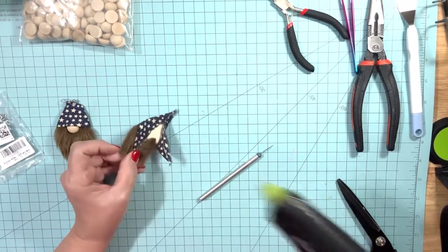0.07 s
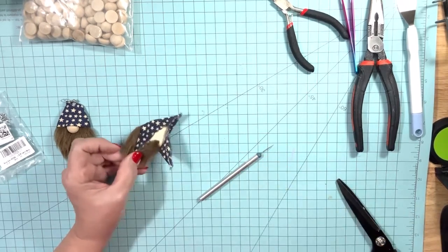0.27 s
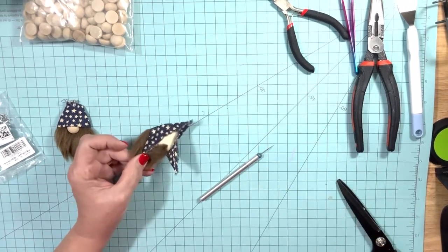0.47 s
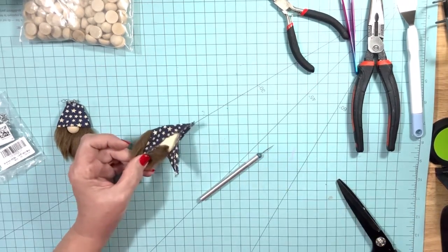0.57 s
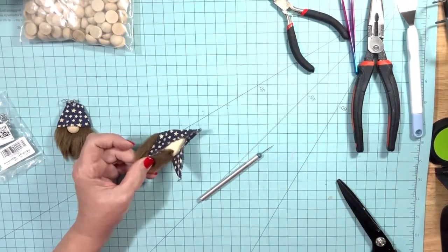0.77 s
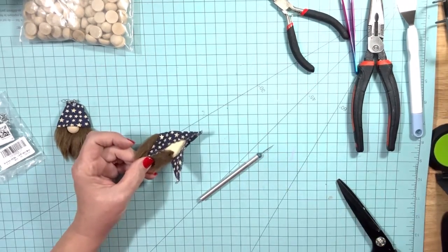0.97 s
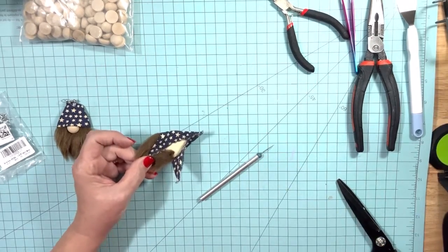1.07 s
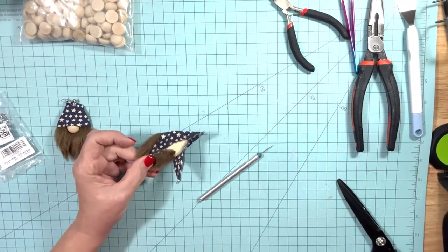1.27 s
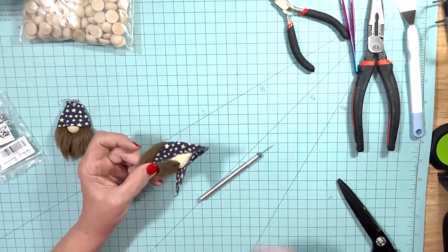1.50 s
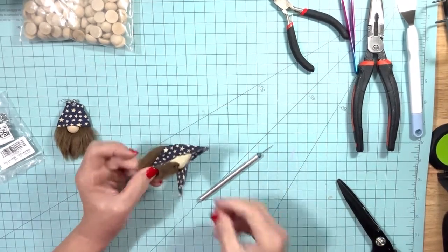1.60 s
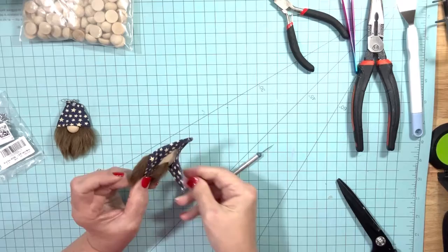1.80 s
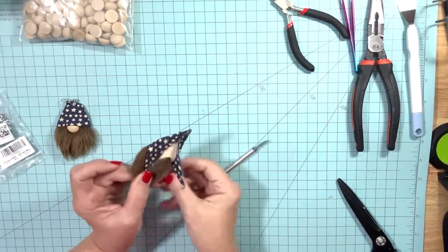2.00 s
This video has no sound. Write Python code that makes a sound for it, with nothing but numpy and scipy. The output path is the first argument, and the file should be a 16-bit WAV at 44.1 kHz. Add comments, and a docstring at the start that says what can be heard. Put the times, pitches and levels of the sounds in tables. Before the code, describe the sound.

Hard hollow plastic knocks and rattles as a glue gun is set down in a quiet humming room.

```python
"""In a small quiet room a plastic glue gun is put down on a mat-covered table: it touches, rocks and drops onto its stand.
Each contact is a push with a rough tail that excites decaying shell modes and an unpitched clack,
while the table modes give a thump dispersed by bending waves; filtered, decaying noise forms the echoes.
An appliance sounds throughout: wavering sines hum, shaped noise blows, narrow noise bands whistle.
Faint puffs of narrow hiss rustle near the end as the hand comes back."""
import sys
import numpy as np
from scipy import signal
from scipy.fft import rfft, irfft
from scipy.io import wavfile

SR = 44100
rng = np.random.default_rng(int(sys.argv[2]) if len(sys.argv) > 2 else 0)


def unload_audio(sound):
    """Save the sound as a 16-bit wav file, at the path given as the first command line argument."""
    columns = np.transpose(np.atleast_2d(sound))
    # keep every value between -1 and 1, then stretch to whole-number steps
    steps = np.round(np.clip(columns, -1, 1) * 32767)
    wavfile.write(sys.argv[1], SR, steps.astype(np.int16))


N = 90404

# Contacts of the gun: [t/s, shell energy level/dB before stereo balance, shell slope/(dB per octave),
# chatter decay time/s, favoured f/Hz, relative thump level/dB, thump slope/(dB per octave)]
GUN_CONTACTS = [(0.09, -38, 6, 0.0043, 13000, -68, -22), (0.7930, -8.5, -2, 0.0057, 3700, -20.5, -2),
                (.8030, -17, -0.5, 0.012, 3100, -34.5, -5.5), (.8105, -13.5, -5, 0.006, 2000, -33.5, 3.5),
                (0.8138, -12.5, 0.5, 0.0047, 5870, -30, 1), (0.8215, -10, -1.5, 0.0022, 3570, -41, 0),
                (.8320, -14, 0, 0.0069, 1410, -42.5, 3.5), (0.8403, -7, 1, 0.0086, 2800, -46, 2.5),
                (0.8452, -3.5, -2, 0.0077, 6250, -37, 6), (0.8483, -7.5, -3.5, 0.00081, 1000, -37.5, 5),
                (0.8533, -7.5, -4, 0.0041, 2370, -28, -8), (0.8600, -7, -2, 0.0068, 2440, -33, 7),
                (0.875, -15, 1, 0.0072, 2470, -51.5, 6), (0.911, -17.5, -0.5, 0.045, 3700, -41, -1),
                (0.9393, -0.5, 4, 0.0019, 6820, -29.5, 3), (0.9400, 1.5, 3, 0.00087, 3700, -25, -2.5),
                (0.9408, 6.5, -1, 0.0014, 1056, -29, 7), (.9432, -2.5, 0.5, 0.00081, 3700, -50, 6),
                (0.9476, -2, -8.5, 0.0032, 2230, -37, 4.5), (.9550, -5.5, 0.5, 0.0021, 4500, -43, 10),
                (0.9559, 0, -2, 0.0016, 1760, -37, 8), (0.9616, -10, 1, 0.0023, 1660, -38.5, 4.5),
                (0.9668, -6, -7, 0.0022, 1230, -36, 3), (.9760, -20, 0, .005, 2200, -37, 5)]
# Modes of the hollow shell: [f/Hz, relative level/dB, 60 dB decay time/s]
SHELL_MODES = [(704, -1.5, 0.022), (954, 1.5, 0.015), (1329, 0, 0.018), (1680, -4.5, 0.018),
               (1924, -2.5, 0.021), (2311, -5, 0.027), (2650, -5, 0.013), (3004, -6.5, 0.016),
               (3250, -7.5, 0.01), (3700, -2, 0.0093), (4340, -8, 0.014), (4950, -6, 0.0066),
               (6460, -4, 0.0036), (7480, -8, 0.0055)]
# Modes of the table top: [f/Hz, relative level/dB, 60 dB decay time/s]
TABLE_MODES = [(70.6, -6, 0.098), (90.7, 0, 0.079), (137, -3.5, 0.088), (190, 0, 0.06), (270, 1.5, 0.031),
               (379.6, -4, 0.11), (502, -6.5, 0.071)]
# Unpitched clack of the contact: [f/Hz, relative level/dB]
CLACK_SPECTRUM = [(400, -14), (1000, -12), (2500, -12), (5000, 1), (8000, 9.5), (10000, 5.5), (12200, 14.5),
                  (16000, 3.5)]
# Stereo phase of the shell sound: [f/Hz, lead of left over right/rad]
SHELL_PHASE_LEAD = [(0, 0), (900, -.5), (2200, -1.5), (2750, -2.7), (3450, 0), (4200, 0), (5500, 1.2),
                    (7500, 1.8), (9500, 3.1), (12000, 4.9), (14500, 6.3), (22000, 6.3)]
# Stereo balance of the direct knocks: [f/Hz, left minus right level/dB]
DIRECT_BALANCE = [(60, 0), (200, -.5), (380, -3), (700, 0), (1300, 3), (2400, 2.5), (4400, .5), (8000, 0)]
# Reverberation time of the room: [f/Hz, 60 dB decay time/s]
REVERB_TIME = [(100, 0.41), (1000, 0.17), (4000, 0.14), (12000, 0.1)]
# Width of the reflections: [f/Hz, side minus mid level/dB]
REVERB_WIDTH = [(100, -27), (300, -6.5), (800, 2), (5000, -1.5), (7500, -3.5), (9500, 11), (11000, 0),
                (13000, -9)]
# Rustles as the hand comes back: [t/s of peak, rms level/dB at peak]
HAND_RUSTLES = [(1.630, -65), (1.698, -65), (1.715, -68), (1.772, -66), (1.804, -64), (1.864, -64)]
# Motor tones: [mean f/Hz, rms level/dB before waver, waver spread/dB]
MOTOR_TONES = [(58.26, -40.5, 1.26), (120.7, -54, 3), (186.2, -62, 1.5)]
# Whistles in the rush: [centre f/Hz, full width at half amplitude/Hz, rms level/dB averaged over
# the channels, left minus right level/dB]
WHISTLES = [(400, 15, -66.5, 18), (783.7, 11, -63, 0.5), (1437, 14, -65.5, 6.5), (1679, 13, -65.5, 16),
            (1743, 41, -62, 14), (2387, 200, -66.5, 5), (3440, 110, -89.5, -5)]
# Air noise common to both channels: [f/Hz, relative spectral level/dB]
AIR_COMMON = [(30, -33), (82, -21.5), (101, -8.5), (135, -8.5), (166, -18), (244, -13.5), (314, -25.5),
              (385, -17.5), (579, -26.5), (700, -23), (1200, -31.5), (1690, -22.5), (2170, -36),
              (2600, -36.5), (3200, -41), (6750, -46.5), (7730, -57), (8300, -79), (10500, -101.5),
              (11300, -58.5), (14000, -53), (15500, -54.5), (15900, -100)]
# Air noise opposed in the channels: [f/Hz, relative spectral level/dB]
AIR_OPPOSED = [(24, -88.5), (40, -47.5), (124, -40.5), (202, -5.5), (222, -14), (264, -4), (464, -11),
               (721, -0.5), (1070, -6), (1620, -4), (1880, -3), (3910, -19), (8580, -25), (11800, -34),
               (14000, -80)]
# Stereo balance of the air noise: [f/Hz, left minus right level/dB]
AIR_STEREO = [(60, 7.5), (110, 0.5), (200, -1.5), (380, -1.5), (700, 4.5), (1290, 9), (2380, 4.5),
              (4400, 0.5), (8120, 0.0), (15000, 1.5)]

SPAN, LEAD_IN = 16384, 256  # samples per response, and kept ahead of each contact
SHELL_LOW_HZ, TABLE_LOW_HZ = 350, 55  # radiation falls steeply below these
SHELL_PIVOT_HZ, TABLE_PIVOT_HZ = 2660, 173  # the slopes turn about these
STRIKE_SPREAD_DB = 2  # uneven excitation of the modes
FAVOUR_DB, FAVOUR_OCTAVES = 10, 0.26  # lift near the pitch of the part that touches
CHATTER_S = 0.0022  # a contact that chatters this long is as much scrape as sharp push
BEND_DELAY_S, BEND_POWER = 0.002985, 0.89  # delay at 100 Hz, and how it falls with pitch
ROOM_DB, ROOM_START_S = -11, 0.003
RUSTLE_HZ, RUSTLE_WIDTH_HZ, RUSTLE_S = 3930, 220, 0.009
HUM_WAVER_HZ, HUM_DETUNE = 8.0, 0.008  # detune is a fraction of the pitch
AIR_MID_DB, AIR_SIDE_DB = -45, -51  # rms before the stereo balance
CUTOFF_HZ = 16700
LEFT_RIGHT = np.array([[1], [-1]])  # opposite signs in the two channels


def from_db(db):
    """Decibel law: 20 dB is a factor of ten in amplitude."""
    return 10 ** (np.asarray(db) / 20)


def rms_one(x):
    """Normalisation to unit root-mean-square amplitude."""
    return x / np.sqrt(np.mean(x ** 2) + 1e-20)


def at_hz(points, hz):
    """Linear interpolation of a table over logarithmic frequency."""
    table = np.array(points)
    return np.interp(np.log(hz + 1), np.log(table[:, 0]), table[:, 1])


def both(x, balance):
    """Interchannel level difference: each frequency is shared between left and right."""
    half_db = at_hz(balance, np.fft.rfftfreq(N, 1 / SR)) / 2
    return irfft(rfft(x) * from_db([half_db, -half_db]), N)


def gun():
    """Superposition of impacts: each contact radiates a shell knock and a dispersed table thump."""
    hz = np.fft.rfftfreq(SPAN, 1 / SR)
    clack = from_db(at_hz(CLACK_SPECTRUM, hz))
    table = body(TABLE_MODES) * bending_waves(hz)
    lead = np.exp(0.5j * np.interp(hz, *np.transpose(SHELL_PHASE_LEAD)) * LEFT_RIGHT)
    fade = np.clip(2 - 2 * np.arange(SPAN) / SPAN, 0, 1)  # over the second half
    out = np.zeros((2, N + SPAN))
    for s, db, slope_db, chatter_s, favour_hz, thump_db, thump_slope_db in GUN_CONTACTS:
        knock = shell_knock(hz, clack, chatter_s, favour_hz, slope_db)
        knock *= from_db(db) / np.linalg.norm(irfft(knock, SPAN))
        thump = from_db(thump_db) * table * tilt(hz, thump_slope_db, TABLE_PIVOT_HZ, TABLE_LOW_HZ)
        sound = irfft(knock * lead + thump, SPAN)
        # The phase lead can put sound ahead of the contact, so room is left for it.
        start = int(s * SR) - LEAD_IN
        out[:, start:start + SPAN] += np.roll(sound, LEAD_IN, axis=1) * fade
    return both(out[:, :N], DIRECT_BALANCE)


def shell_knock(hz, clack, chatter_s, favour_hz, slope_db):
    """Linear response: the spectrum of the force times that of the shell and the clack."""
    uneven_db = rng.normal(0, STRIKE_SPREAD_DB, len(SHELL_MODES))
    modes = [(f, level + odd, t60) for (f, level, t60), odd in zip(SHELL_MODES, uneven_db)]
    octaves_off = np.log2((hz + 1) / favour_hz)
    favour = from_db(FAVOUR_DB * np.exp(-(octaves_off / FAVOUR_OCTAVES) ** 2))
    slope = tilt(hz, slope_db, SHELL_PIVOT_HZ, SHELL_LOW_HZ)
    return rfft(contact_force(chatter_s)) * (body(modes) + clack) * favour * slope


def contact_force(chatter_s):
    """Impulsive excitation followed by friction: a sharp push, then exponentially decaying noise."""
    t = np.arange(SPAN) / SR
    push = t == 0
    decay = rms_one(np.exp(-t / chatter_s)) / np.sqrt(SPAN)
    return push + chatter_s / CHATTER_S * decay * rng.standard_normal(SPAN)


def body(modes):
    """Modal superposition: a struck body rings in decaying sines, here of alternating sign."""
    t, ring = np.arange(SPAN) / SR, 0
    for k, (hz, db, t60) in enumerate(modes):
        ring = ring + (-1) ** k * from_db(db - 60 * t / t60) * np.sin(2 * np.pi * hz * t)
    return rfft(ring)


def bending_waves(hz):
    """Dispersion: bending waves of low pitch arrive later, so the thump sweeps downward."""
    # The phase is the integral over frequency of the delay BEND_DELAY_S * (100 / hz) ** BEND_POWER.
    rest = 1 - BEND_POWER
    return np.exp(-2j * np.pi * BEND_DELAY_S * 100 ** BEND_POWER * hz ** rest / rest)


def tilt(hz, db_per_octave, pivot_hz, low_hz):
    """Causal power-law filter: a constant slope per octave, with a steep cut in the bass."""
    s = 1j * (hz + 1) / low_hz
    slope = (s * low_hz / pivot_hz) ** (db_per_octave / (20 * np.log10(2)))
    bass_cut = (s * s / (s * s + np.sqrt(2) * s + 1)) ** 2
    return slope * bass_cut


def room(x):
    """Diffuse reverberation: dense reflections decay exponentially at a rate set by frequency band."""
    t, echo = np.arange(SPAN) / SR, 0
    white = rng.standard_normal((2, 2, SPAN)) * (t > ROOM_START_S)
    for k, hz in enumerate(62.5 * 2 ** np.arange(0, 8, 0.5)):  # half-octave bands, by lower edge
        band = signal.butter(2, [hz, np.sqrt(2) * hz], "band", fs=SR, output="sos")
        mid, side = signal.sosfilt(band, white[k % 2])  # neighbouring bands use different noise
        wide = from_db(at_hz(REVERB_WIDTH, 1.19 * hz))  # read at the band centre
        stereo = (mid + wide * side * LEFT_RIGHT) / np.sqrt(1 + wide ** 2)
        echo = echo + from_db(-60 * t / at_hz(REVERB_TIME, hz)) * stereo
    echo = echo / np.linalg.norm(echo[0])
    return from_db(ROOM_DB) * signal.fftconvolve(x[None], echo, axes=1)[:, :N]


def rustle():
    """Amplitude modulation: Gaussian envelopes shape narrow-band noise into short puffs."""
    t = np.arange(N) / SR
    edges = [RUSTLE_HZ - RUSTLE_WIDTH_HZ / 2, RUSTLE_HZ + RUSTLE_WIDTH_HZ / 2]
    band = signal.butter(2, edges, "band", fs=SR, output="sos")
    hiss = rms_one(signal.sosfilt(band, rng.standard_normal(N)))
    puffs = sum(from_db(db) * np.exp(-((t - s) / RUSTLE_S) ** 2) for s, db in HAND_RUSTLES)
    return puffs * hiss


def hum():
    """Frequency and amplitude modulation: motor tones waver together in pitch, apart in level."""
    turns = np.cumsum(1 + HUM_DETUNE * drift(HUM_WAVER_HZ)) / SR
    out = 0
    for hz, db, waver_db in MOTOR_TONES:
        level = np.sqrt(2) * from_db(db + waver_db * drift(HUM_WAVER_HZ))
        out = out + level * np.sin(2 * np.pi * hz * turns)
    return out


def drift(rate_hz):
    """Low-pass filtered chance: two equal poles smooth white noise to a waver of spread 1."""
    r = np.exp(-2 * np.pi * rate_hz / SR)
    smooth = signal.lfilter([1], [1, -2 * r, r * r], rng.standard_normal(N + SR))
    return rms_one(smooth[SR:])  # drop the filter's first second


def whine():
    """Resonance: narrow peaks select whistles from noise independent in the two channels."""
    hz, out = np.fft.rfftfreq(N, 1 / SR), 0
    for centre_hz, width_hz, db, pan_db in WHISTLES:
        resonance = 1 / (1 + (2 * (hz - centre_hz) / width_hz) ** 2)
        tone = irfft(rfft(rng.standard_normal((2, N))) * resonance, N)
        out = out + from_db(db + pan_db / 2 * LEFT_RIGHT) * rms_one(tone)
    return out


def air():
    """Broadband flow noise: the appliance's steady rush, as common and opposed channel parts."""
    mid = shaped_noise(AIR_COMMON, AIR_MID_DB)
    side = shaped_noise(AIR_OPPOSED, AIR_SIDE_DB)
    return both(mid + side * LEFT_RIGHT, AIR_STEREO)


def shaped_noise(shape, db):
    """Spectral shaping: white noise is weighted by frequency and set to an rms level."""
    hz = np.fft.rfftfreq(N, 1 / SR)
    weight = from_db(at_hz(shape, hz)) * (hz > 25)
    return from_db(db) * rms_one(irfft(rfft(rng.standard_normal(N)) * weight, N))


def scene():
    """Linear superposition of the gun, its reflections, the rustles and the steady background."""
    knocks = gun()
    return knocks + room(knocks[0]) + rustle() + hum() + whine() + air()  # left knocks feed the room


def record(dry):
    """Low-pass filtering: the extreme treble is cut steeply."""
    return signal.sosfilt(signal.cheby2(12, 70, CUTOFF_HZ, fs=SR, output="sos"), dry)


dry = scene()
out = record(dry)
unload_audio(out)
```